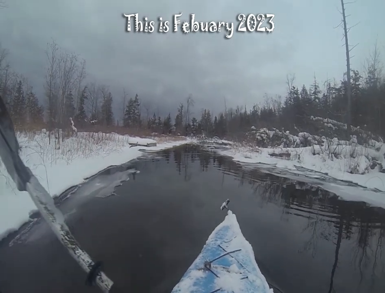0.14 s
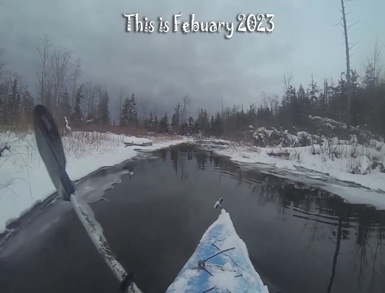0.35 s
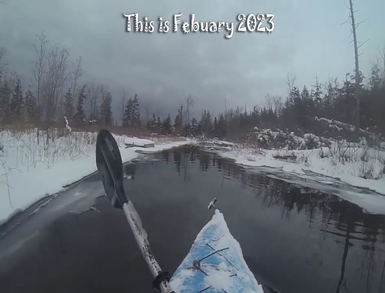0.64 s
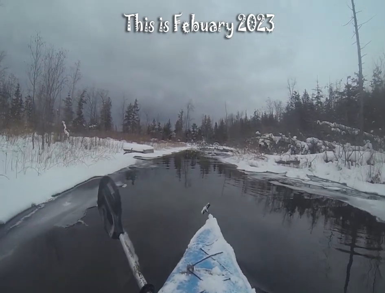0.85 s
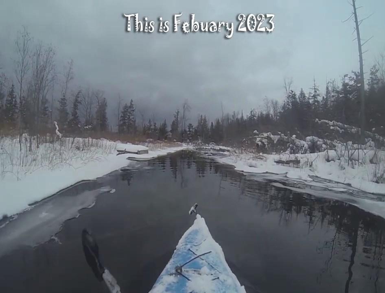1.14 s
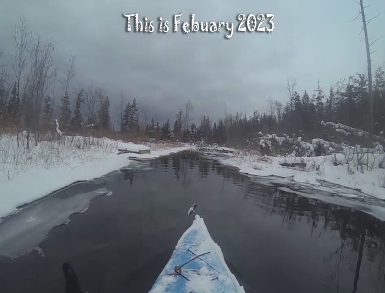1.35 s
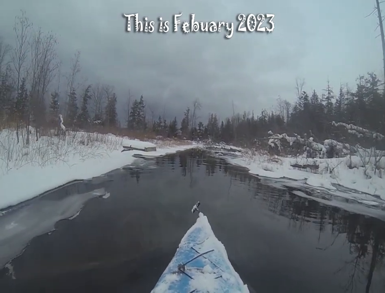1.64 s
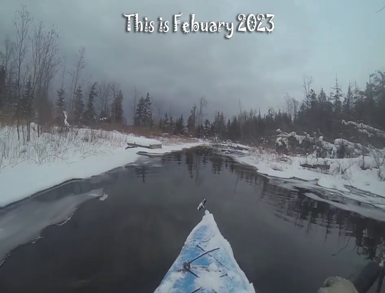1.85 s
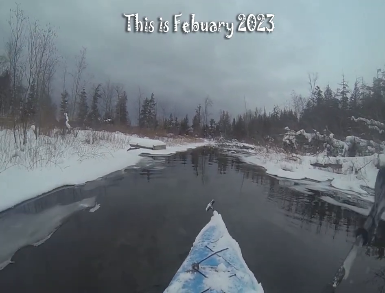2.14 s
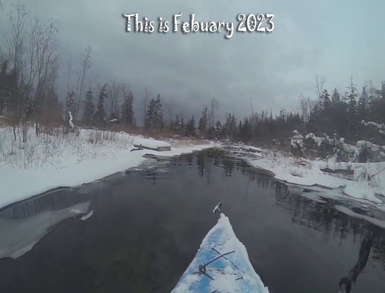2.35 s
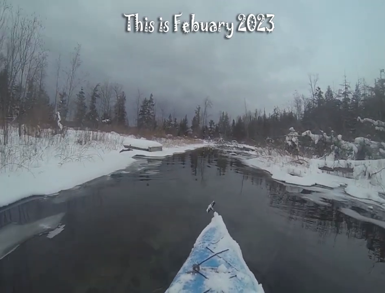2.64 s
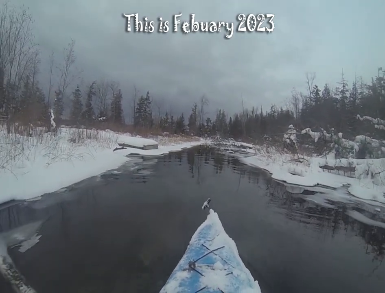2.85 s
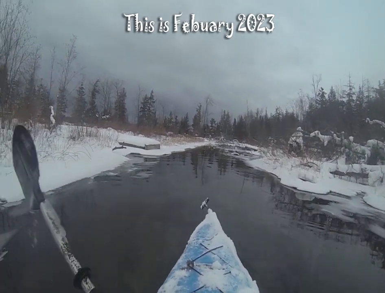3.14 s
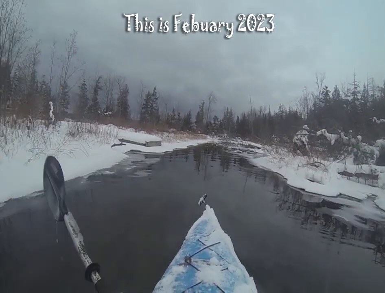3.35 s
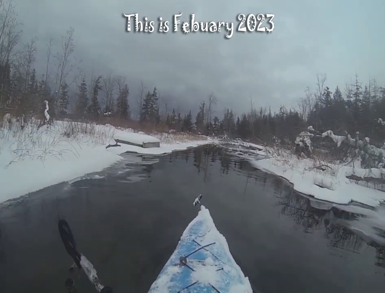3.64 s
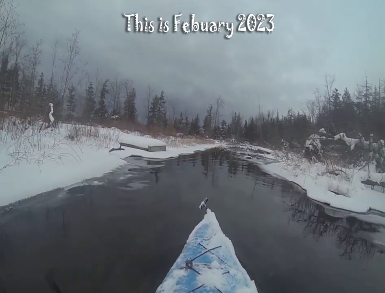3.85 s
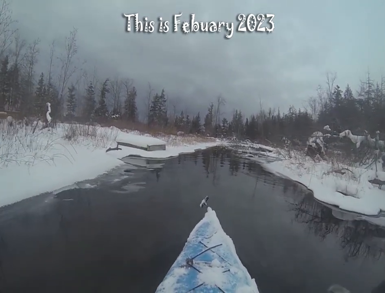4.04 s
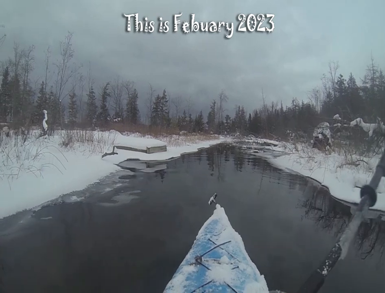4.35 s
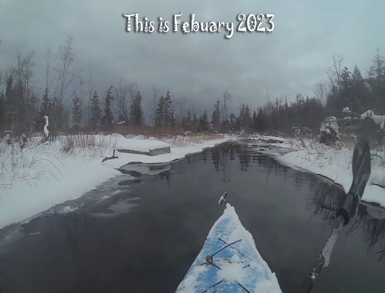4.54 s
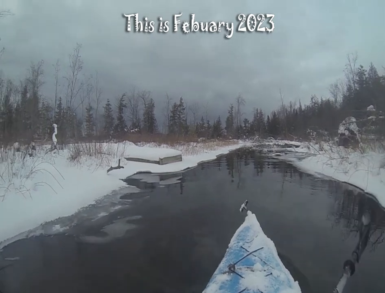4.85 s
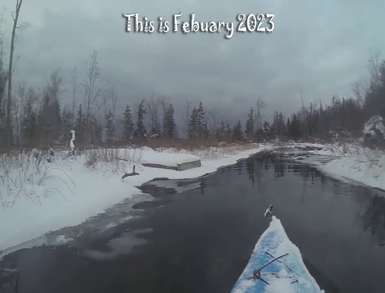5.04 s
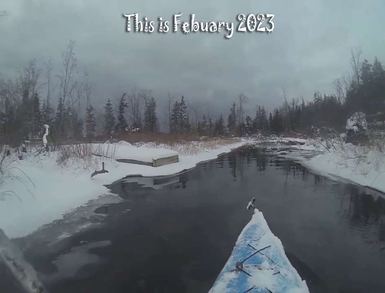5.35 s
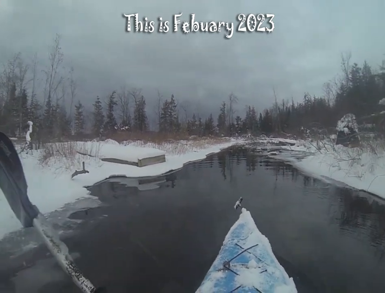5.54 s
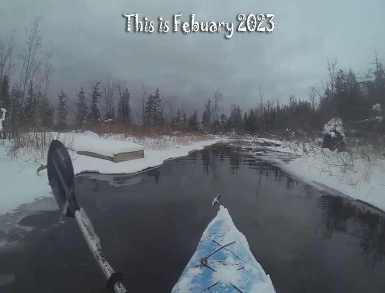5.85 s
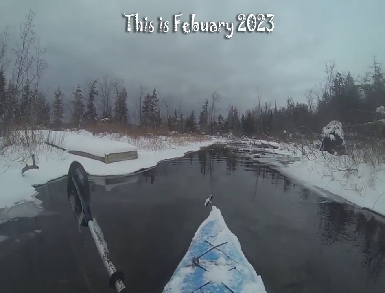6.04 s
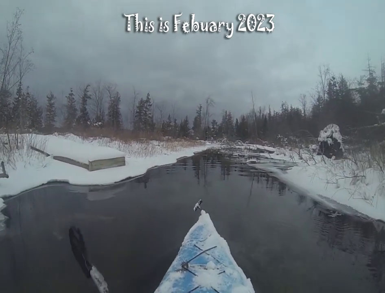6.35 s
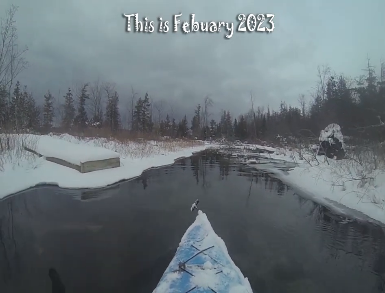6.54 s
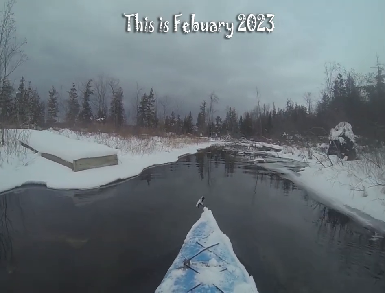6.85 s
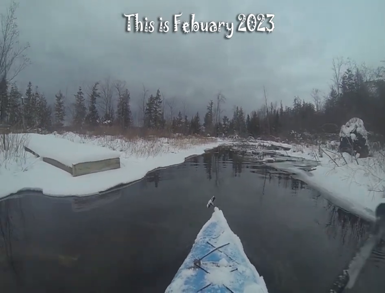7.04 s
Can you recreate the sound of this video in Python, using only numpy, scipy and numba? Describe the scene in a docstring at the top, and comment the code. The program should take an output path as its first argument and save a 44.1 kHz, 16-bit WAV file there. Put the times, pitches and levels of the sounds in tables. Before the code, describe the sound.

A kayak glides along a quiet creek: hollow water plips, light trickling, one soft hull knock, deep uneven rumble and thin electronic buzz.

```python
"""A small camera in a sealed case rides a kayak up a calm winter creek.
From the start, gusts and wavelets rumble in the hull, over a trickle, spray, hiss and a whine pulsed per frame.
Paddle drips ring and case-coloured snaps start early, crowding after 2 s with ticks and airy splashes.
Near 5 s the paddle shaft knocks the hull once, exciting its modes; drips go on to a loud one at the end.
Drips are gliding damped sines; rumble, snaps and hiss are filtered noise; trickle and fizz are bubble swarms."""
import sys
import numpy as np
from scipy import signal
from scipy.fft import rfft, irfft
from scipy.io import wavfile
from scipy.ndimage import uniform_filter1d
from numba import njit

SR = 44100
rng = np.random.default_rng(int(sys.argv[2]) if len(sys.argv) > 2 else 0)


def waveform_to_disk(signal):
    """Save audio, clipped to [-1, 1], as 16-bit WAV at the path in sys.argv[1]."""
    frames = np.transpose(np.atleast_2d(signal))
    scaled = np.clip(frames, -1, 1) * 32767
    samples = np.round(scaled).astype(np.int16)
    wavfile.write(sys.argv[1], SR, samples)


def level_to_linear(level):
    """Convert decibel levels to linear amplitude factors, elementwise."""
    exponent = np.asarray(level, float) / 20
    return 10 ** exponent


N = 317079
T = np.arange(N) / SR  # [s]

# gusts heaving the hull: (peak time [s], gain added to calm [dB])
GUSTS = [(0.0, -28.5), (0.2, -29.5), (0.56, -32), (0.8, -40), (1.04, -33), (1.74, -34.5), (2.02, -44.5),
         (2.36, -37), (2.72, -38), (3.02, -38), (3.27, -39.5), (3.96, -40.5), (4.22, -33.5), (4.93, -36),
         (5.43, -34), (6.15, -43), (6.79, -40), (6.95, -41.5), (7.17, -36.5)]
GUST_RISE_S, GUST_FALL_S, CALM_DB = 0.059, 0.065, -42.5
# wavelets slapping the hull: (peak time [s], gain added to lapping [dB])
SLAPS = [(0.18, -50.5), (0.4, -48.5), (0.72, -46), (0.86, -40), (1.04, -49.5), (1.74, -50), (2.02, -50.5),
         (2.36, -38.5), (2.75, -44.5), (3.35, -48), (3.92, -50), (4.2, -50.5), (4.54, -45.5), (4.68, -48.5),
         (5.43, -49), (5.87, -42.5), (6.67, -49.5), (6.85, -49.5)]
SLAP_RISE_S, SLAP_FALL_S, LAP_DB = 0.04, 0.048, -59
# drips and plops: (time [s], ring peak [dB], starting pitch [Hz], snap re ring [dB])
DRIPS = [(0.232, -61, 1520, -17), (0.3707, -40, 1486, -16), (0.832, -51.5, 1490, -15),
         (0.9436, -58, 1570, -18), (1.0734, -52.5, 1540, -21), (1.183, -49, 1490, -20),
         (1.5135, -56, 1490, -13), (1.65, -50.5, 1480, -26), (2.1326, -55, 1410, -24),
         (2.1795, -44.5, 1366, -22), (2.191, -49, 1550, -27), (2.236, -60, 1850, -14),
         (2.2493, -55, 1460, -25), (2.2748, -45, 1444, -19), (2.293, -49, 1360, -9), (2.33, -55, 1640, -22),
         (2.38, -44, 1460, -20), (2.41, -43.5, 1404, -25), (2.43, -60, 2050, -16), (2.616, -51, 1440, -18),
         (2.64, -56.5, 1490, -25), (2.844, -57, 1460, -10), (3.1273, -52, 1470, -22),
         (3.3702, -47, 2080, -13), (3.413, -55.5, 1560, -12), (3.5686, -44.5, 1494, -23),
         (3.5833, -53, 1590, -17), (3.665, -58, 1460, -9), (3.693, -59, 2040, -18), (3.7928, -56, 1510, -9),
         (3.9335, -51, 1500, -17), (4.0175, -51, 1750, -0.5), (4.029, -55, 1500, -18),
         (4.186, -53, 1400, -20), (4.405, -54.5, 1490, -7), (4.4657, -58, 1430, -21),
         (4.6068, -46, 1490, -17), (4.6578, -48, 1580, -18), (4.67, -57, 1200, -20),
         (4.712, -56, 1400, -20), (4.737, -54, 1630, -14), (4.755, -48.5, 1364, -21),
         (4.9818, -51.5, 1420, -24), (5.0467, -55, 1270, -20), (5.271, -47.5, 1340, -25),
         (5.395, -40, 1464, -33), (5.4045, -55, 1410, -19), (5.4525, -50.5, 1330, -14),
         (5.7254, -60, 1430, -18), (5.8224, -57, 1430, -13), (5.841, -47.5, 1570, -22),
         (5.967, -45.5, 1500, -11), (5.9918, -59, 1490, -18), (6.0916, -56, 1480, -12),
         (6.115, -54, 1580, -16), (6.2206, -55.5, 1600, -12), (6.236, -58, 1950, -14),
         (6.243, -57, 1500, -18), (6.577, -50.5, 1634, -19), (6.6902, -58, 1420, -14),
         (6.834, -55, 1070, -16), (6.836, -57, 1610, -20), (7.007, -59, 1560, -18),
         (7.1015, -56, 1570, -20), (7.1628, -36.5, 1490, -37)]
# phase glide: the instantaneous pitch rises by twice this share over one t60
DRIP_CYCLES, DRIP_SWELL_S, DRIP_PHASE_GLIDE = 28, 0.0033, 0.035  # cycles and swell at full length
HALF_LENGTH_SNAP_DB, SHORTER_PER_DB = -13, 0.1  # harder snaps shorten ring and swell
# paddle shaft on the hull: (time [s], level [dB])
KNOCKS = [(4.9593, -32.5)]
# hull modes: (frequency [Hz], level re knock [dB], t60 [s])
HULL_MODES = [(81, 4, 0.031), (179, -6, 0.0058), (420, -9.5, 0.003), (745, -7, 0.0069),
              (1230, -4.5, 0.0026)]
KNOCK_TOP_HZ = 1700
# spray ticking on the case: (time [s], ring level [dB], starting pitch [Hz])
TICKS = [(0.1436, -62, 3540), (2.0697, -52, 4730), (2.252, -52, 3400), (2.4, -51.5, 2880),
         (2.4438, -57, 3060), (2.5005, -54.5, 3060), (2.5644, -52.5, 3460), (2.6354, -55, 3400),
         (2.6444, -58, 4000), (2.69, -56, 3250), (2.7013, -53, 3620), (2.724, -55, 3600), (2.73, -56, 4660),
         (3.5748, -57, 3330), (3.59, -59, 4700), (3.6027, -59, 3280), (4.026, -57, 3240),
         (4.4024, -56, 3560), (4.4503, -48, 3580), (4.737, -46, 3470), (4.7424, -46, 3040),
         (5.107, -56.5, 4000), (5.192, -59, 3900), (5.2063, -54, 4120), (5.2214, -56, 3770),
         (5.6875, -58, 3920), (5.69, -56, 4900), (5.8924, -53, 4880), (5.968, -58, 4900),
         (7.1097, -57, 3370)]
TICK_SNAP_DB = -26  # re ring
# droplets bursting with a bright crack, no ring: (time [s], level [dB])
CRACKS = [(2.0623, -63), (5.8344, -65)]
# airy splashes: (centre time [s], length between 1/e points [s], level [dB], centre [Hz])
SPLASHES = [(0.15, 0.031, -69.5, 4500), (1.95, 0.17, -72.5, 5900), (2.40, 0.29, -77, 3380),
            (2.702, 0.083, -66, 3860), (3.584, 0.039, -66, 4200), (4.447, .08, -75, 3600),
            (4.737, 0.041, -69, 3380), (5.225, 0.073, -77, 4300)]
# water running off the lifted blade: (time of most flow [s], gain added to trickle [dB])
RUNOFF = [(0.2, -71), (1.04, -68.5), (2.34, -64), (3.36, -73.5), (4.02, -72), (4.62, -64.5), (5.39, -75),
          (6.01, -72.5), (7.17, -65)]
RUNOFF_RISE_S, RUNOFF_FALL_S, TRICKLE_DB = 0.19, 0.16, -79
SPRAY_DB, AIR_DB = -75.5, -77.5  # rms; spray before its slow wander
# case resonances: (frequency [Hz], width before broadening [Hz], gain [dB])
CASE_MODES = [(1490, 327, 4), (1968, 113, -3.5), (3343, 700, -3), (4880, 360, -14)]
CASE_BROADENING = 1.17
FRAME_HZ, WHINE_HZ = 48.0, 6447.0
# readout whine, fundamental then octave: (peak [dB], on [share of frame], off [share of frame])
WHINE_PARTIALS = [(-66, .21, 0.63), (-66.5, 0.18, 0.58)]
# circuit hiss and dull outdoor murmur: (frequency [Hz], relative density [dB per Hz])
HISS_SHAPE = [(100, 2.5), (230, 0), (500, -5.5), (1040, -8), (2500, -13), (5600, -19), (8000, -23.5),
              (10700, -26.5), (12000, -25.5), (15000, -30.5)]
HISS_DB = -66.5  # total rms


def level(x, db):
    """Scale to an rms level."""
    return x * level_to_linear(db) / np.sqrt(np.mean(x ** 2))


def band(x, hz, width_hz):
    """One resonance, gain 1 at the centre."""
    return signal.lfilter(*signal.iirpeak(hz, hz / width_hz, fs=SR), x)


def steep(x, lo_hz, hi_hz, order=3):
    """Band-pass with steep skirts."""
    sos = signal.butter(order, [lo_hz, hi_hz], "band", fs=SR, output="sos")
    return signal.sosfilt(sos, x)


def walk(rate_hz):
    """Random levels, one per 1 / rate_hz, slewed twice; spread near 1."""
    hold = int(SR / rate_hz)
    steps = np.repeat(rng.standard_normal(N // hold + 1), hold)
    return 1.78 * uniform_filter1d(uniform_filter1d(steps, hold), hold)[:N]


def surges(rows, rise_s, fall_s, rest_db):
    """Gain that climbs to each peak and dies away after it, added to a resting gain."""
    peaks = sum(level_to_linear(db) * np.exp(np.minimum((T - s) / rise_s, (s - T) / fall_s)) for s, db in rows)
    return level_to_linear(rest_db) + peaks


@njit
def bubbles(start_s, size, hz, t60_s, rise_s, glide):
    """Damped sines that swell, fade ever faster and slide up as the bubble nears the surface."""
    out = np.zeros(N)
    for k in range(len(start_s)):
        first = int(start_s[k] * SR)
        for i in range(min(int((t60_s[k] + rise_s[k]) * SR), N - first)):
            t = i / SR
            swell = np.sin(np.pi / 2 * min(t / rise_s[k], 1.0)) ** 2
            fade = np.exp(-6.9 * (max(t - rise_s[k], 0.0) / t60_s[k]) ** 1.7)
            turns = hz[k] * t * (1 + glide[k] * t / t60_s[k])
            out[first + i] += size[k] * swell * fade * np.sin(2 * np.pi * turns)
    return out


def swarm(lo_hz, hi_hz, cycles, scatter_db, count):
    """Many random bubbles, mostly faint and a few loud, at unit rms."""
    when, pitch, loud, slide = rng.random((count, 4)).T
    hz = lo_hz * (hi_hz / lo_hz) ** pitch
    size = level_to_linear(-scatter_db * np.log(1 - 0.98 * loud))
    return level(bubbles(when * T[-1], size, hz, cycles / hz, 2 / hz, 0.079 * slide), 0)


def snaps(s, db, lo_hz, hi_hz, decay_s):
    """Burst of band noise at each impact, decaying by 1/e per decay_s."""
    gate = np.zeros(N)
    gate[(s * SR).astype(int)] = level_to_linear(db)
    gate = signal.lfilter([1], [1, -np.exp(-1 / (decay_s * SR))], gate)
    return gate * level(steep(rng.standard_normal(N), lo_hz, hi_hz), 0)


def case(x):
    """The sealed case lets the outside through only near its resonances."""
    out = 0
    for hz, width_hz, db in CASE_MODES:
        broad_hz = CASE_BROADENING * width_hz
        out = out + level_to_linear(db) * band(band(x, hz, broad_hz), hz, broad_hz)
    return out


def rumble():
    """Gusts drive a slow heave and dull wash; lapping in three bands bumps independently."""
    gust = surges(GUSTS, GUST_RISE_S, GUST_FALL_S, CALM_DB)
    heave = level(steep(rng.standard_normal(N), 12.4, 37.6), 0)
    lap = 0
    for hz, db in [(60, 0.5), (90, 2), (120, -7)]:
        tone = level(band(rng.standard_normal(N), hz, 0.38 * hz), db)
        lap = lap + tone * level_to_linear(4.66 * walk(14))
    lap = level(steep(lap, 55.0, 138.4), 0)
    wash = level(steep(rng.standard_normal(N), 140, 627, order=2), -37)  # dB re heave
    return (wash + heave) * gust + lap * surges(SLAPS, SLAP_RISE_S, SLAP_FALL_S, LAP_DB)


def drips():
    """Each drip snaps on the surface and its bubble rings, longer at low pitch and after a soft snap."""
    s, db, hz, snap_db = np.transpose(DRIPS)
    keep = np.clip(0.5 - SHORTER_PER_DB * (snap_db - HALF_LENGTH_SNAP_DB), 0.3, 1)
    glide = np.full(len(s), DRIP_PHASE_GLIDE)
    ring = bubbles(s - 0.002, level_to_linear(db), hz, keep * DRIP_CYCLES / hz, keep * DRIP_SWELL_S, glide)
    # ripples and the banks send back a short scattered tail, t60 0.12 s
    tail = rng.standard_normal(SR // 8) * np.exp(-np.log(1000) * T[:SR // 8] / 0.12)
    echo = signal.fftconvolve(ring, level(tail, -49))[:N]
    snap = snaps(s, db + snap_db, 1470, 2740, 0.0039)
    # the impact also sets the case ringing, which beats against the bubble
    return ring + echo + snap + level_to_linear(-8.5) * case(snap)


def knocks():
    """A blow rings the hull modes; the low ones take longest to swell."""
    s, db = np.transpose(KNOCKS)
    one = np.ones(len(s))
    ring = 0
    for hz, mode_db, t60_s in HULL_MODES:
        ring = ring + bubbles(s, level_to_linear(db + mode_db), hz * one, t60_s * one, 0.23 / hz * one, 0 * one)
    return steep(ring, 20, KNOCK_TOP_HZ, order=4)  # a soft contact leaves no treble


def ticks():
    """Spray: a short high ring with a thin snap, and a few bare cracks."""
    s, db, hz = np.transpose(TICKS)
    one = np.ones(len(s))
    ring = bubbles(s - 0.001, level_to_linear(db), hz, 0.0061 * one, 0.00015 * one, 0.012 * one)
    snap = snaps(s, db + TICK_SNAP_DB, 4000, 9500, 0.0039)
    crack = snaps(*np.transpose(CRACKS), 3800, 10000, 0.0045)
    return ring + snap + crack


def splashes():
    """A sheet of water breaks into fine fizz that swells and fades."""
    fizz = swarm(3000, 9000, 7, 3.0, count=7000)
    out = 0
    for s, length_s, db, hz in SPLASHES:
        swell = np.exp(-((T - s) / (length_s / 2)) ** 2)
        out = out + level(band(fizz, hz, 0.5 * hz), db) * swell
    return out


def water():
    """Trickle and spray bubbles ring the case, over steady outdoor air."""
    flow = surges(RUNOFF, RUNOFF_RISE_S, RUNOFF_FALL_S, TRICKLE_DB)
    trickle = level(case(swarm(1100, 2060, 16, 3.2, count=2200)), 0) * flow
    spray = level(case(swarm(2684, 5200, 13.0, 1.5, count=5000)), SPRAY_DB)
    spray = spray * level_to_linear(walk(3.31))  # wander near 1 dB
    air = level(case(rng.standard_normal(N)), AIR_DB)
    return trickle + spray + air


def whine():
    """Sensor readout: a gated tone and octave each frame, phase shifted on alternate frames and jittered."""
    frame, part = np.divmod(T * FRAME_HZ, 1)
    frame = frame.astype(int)
    jitter = 0.14 * rng.standard_normal(frame[-1] + 1)[frame]
    slip = 0.33 * (frame % 2) + jitter  # turns of the fundamental
    turns = WHINE_HZ * part / FRAME_HZ + slip
    edge = 0.015  # share of a frame
    out = 0
    for k, (db, on, off) in enumerate(WHINE_PARTIALS):
        gate = np.clip(np.minimum(part - on, off - part) / edge, 0, 1)
        out = out + level_to_linear(db) * gate * np.sin(2 * np.pi * (k + 1) * turns)
    return out


def hiss():
    """Smooth noise, shaped in frequency by HISS_SHAPE."""
    hz, db = np.transpose(HISS_SHAPE)
    f_hz = np.maximum(np.arange(N // 2 + 1) * SR / N, 1)
    gain = level_to_linear(np.interp(np.log(f_hz), np.log(hz), db, left=-80))
    return level(irfft(rfft(rng.standard_normal(N)) * gain, N), HISS_DB)


def scene():
    """Everything that reaches the microphone."""
    return (rumble() + drips() + knocks() + ticks() + splashes() + water())[None]


def top_cut(x):
    """Nothing passes above the cut-off."""
    return signal.sosfilt(signal.butter(12, 15250, fs=SR, output="sos"), x)


def record(dry):
    """The camera's circuits add hiss and whine."""
    mix = dry + hiss() + whine()
    return top_cut(mix)


dry = scene()
out = record(dry)
waveform_to_disk(out)
```